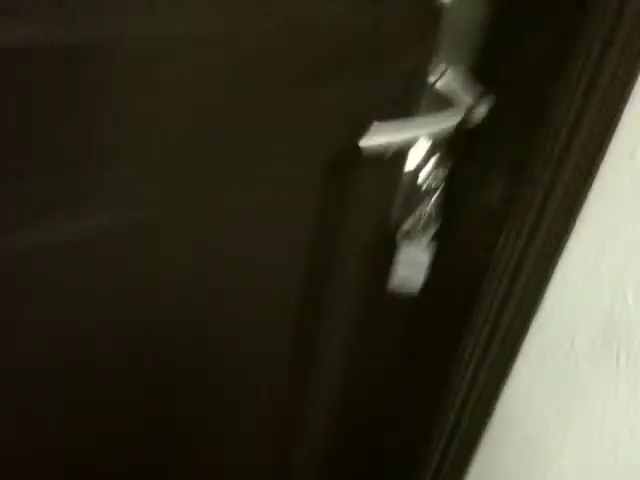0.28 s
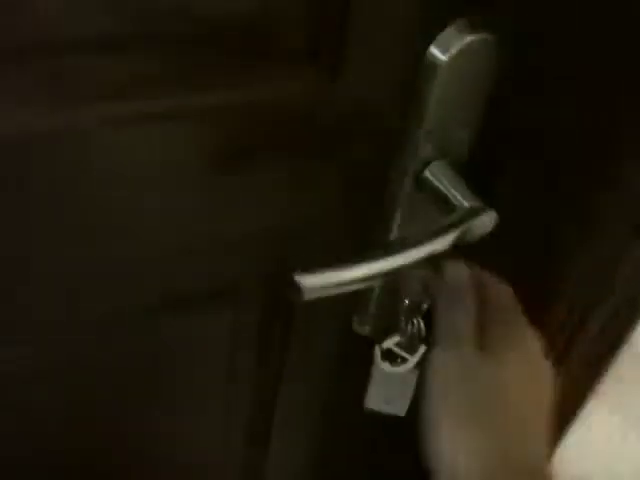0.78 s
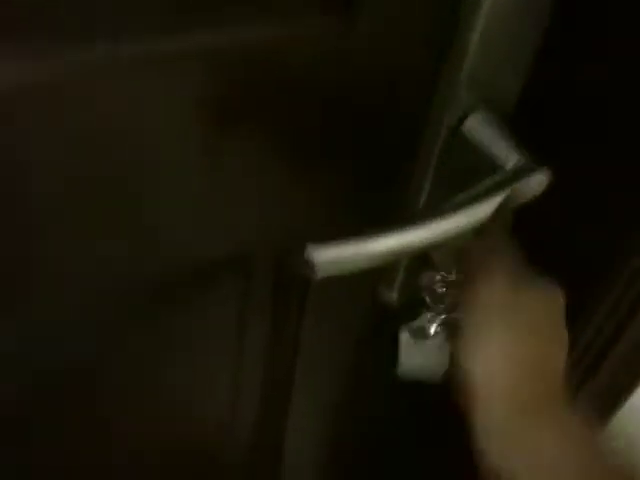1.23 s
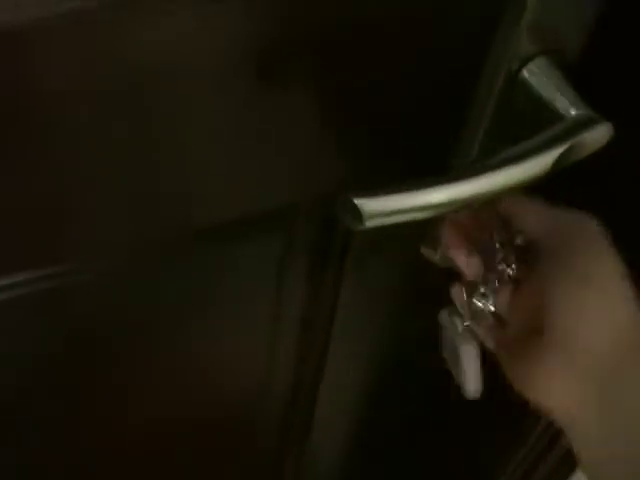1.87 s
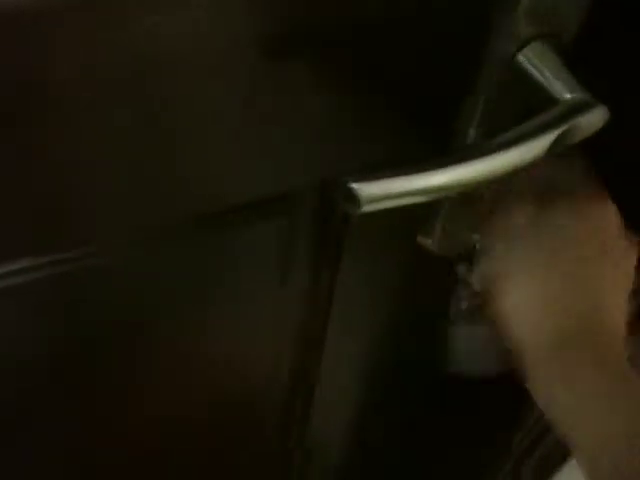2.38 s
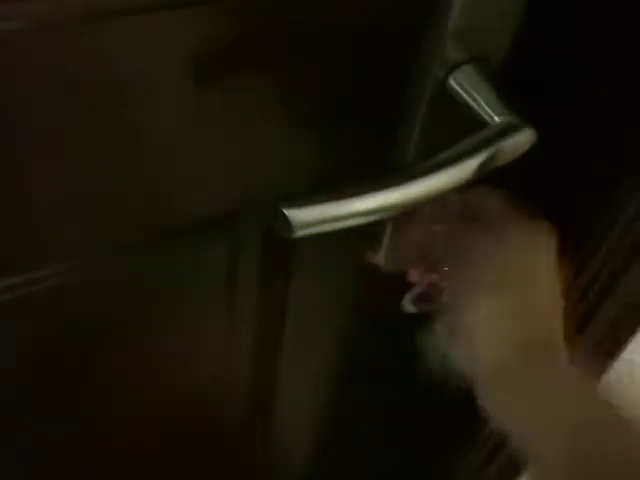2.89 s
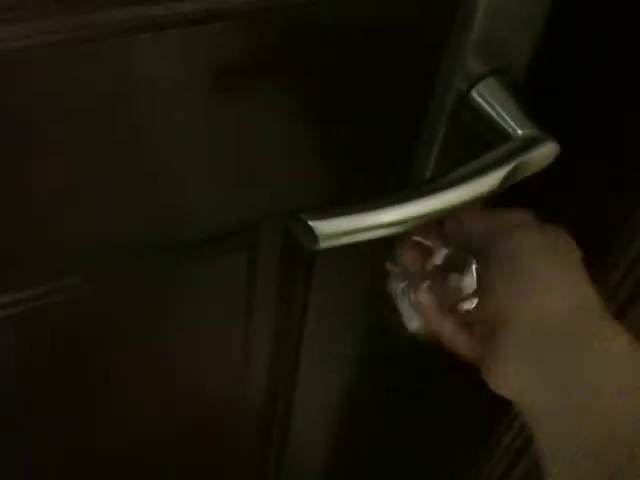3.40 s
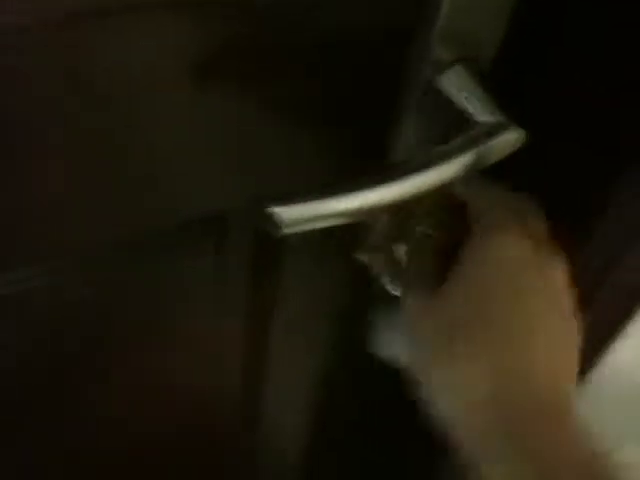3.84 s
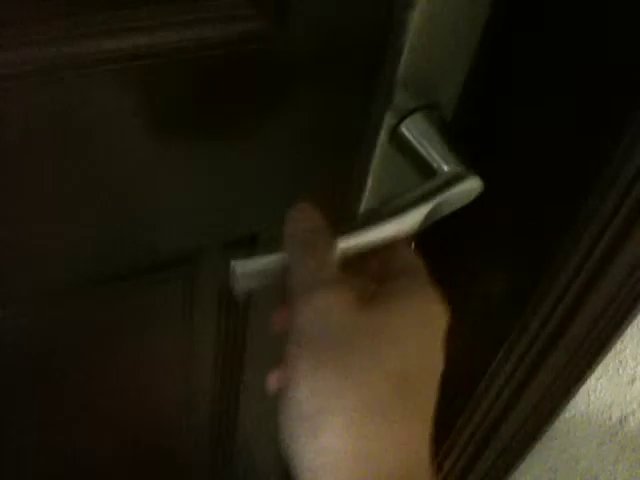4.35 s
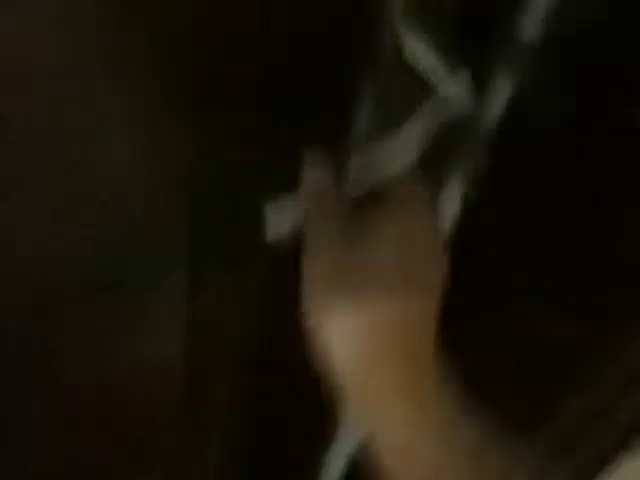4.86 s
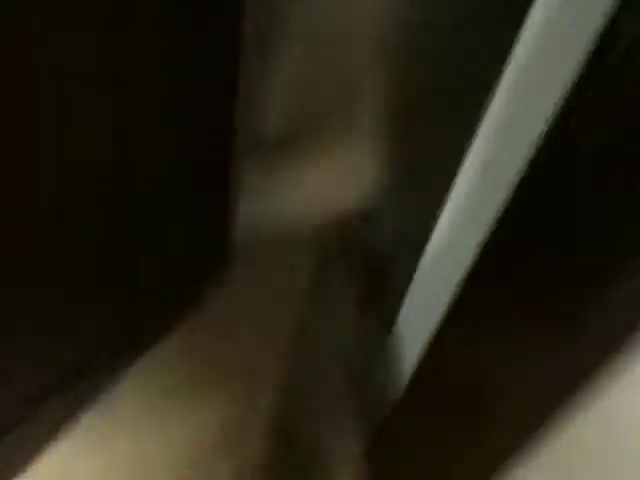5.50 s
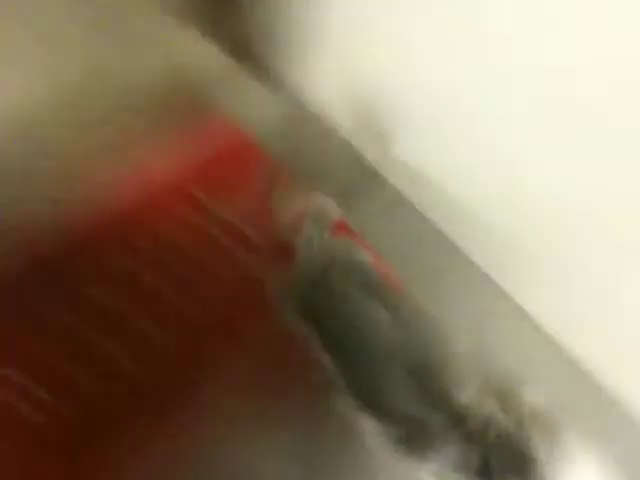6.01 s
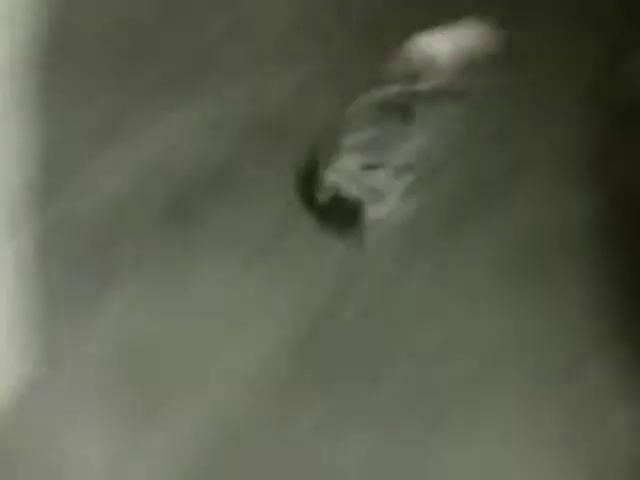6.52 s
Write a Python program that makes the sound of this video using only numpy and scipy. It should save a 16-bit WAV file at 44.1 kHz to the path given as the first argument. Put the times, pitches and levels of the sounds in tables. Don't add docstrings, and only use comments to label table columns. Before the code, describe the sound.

Faint taps and scrapes on wood lead to a key rattling in a metal lock. Sharp bolt clacks come in separate bursts, each with bright ringing keys and a short hollow door resonance. The lever is worked and the latch lets go, then low wobbling thumps hit the microphone. Close phone pickup in a small reverberant indoor space.

```python
import sys
import numpy as np
from scipy import signal
from scipy.fft import rfft, irfft, next_fast_len
from scipy.io import wavfile
from scipy.ndimage import uniform_filter1d

SR = 44100
rng = np.random.default_rng(int(sys.argv[2]) if len(sys.argv) > 2 else 0)


def to_wav(s):
    ch = np.atleast_2d(s).T
    pcm = np.round(np.clip(ch, -1, 1) * 32767)
    wavfile.write(sys.argv[1], SR, pcm.astype(np.int16))


def how_loud(loudness_db):
    steps = np.asarray(loudness_db, float) / 20
    return 10 ** steps


N = 297016

# (frequency [Hz], level [dB])
DOOR = [(60, -54), (130, 2), (170, -9), (300, 0), (470, -1.5), (680, -1.5), (900, -1), (1300, -5.5),
        (2500, -14), (9000, -73.5)]
# (frequency [Hz], level [dB])
LOCK = [(500, -9.5), (1200, 1.5), (1900, 1), (2400, 1.5), (3000, 2.5), (3800, 2), (4900, 1.5), (5800, 2),
        (7500, 0), (12000, -46)]
# (time [s], shudder [dB], after-rattle [dB])
LOADS = [(0.19, -94, -48), (1.14, -54.5, -51.5), (1.5, -59, -80), (2.161, -51.5, -30.5),
         (3.528, -41, -32.5), (3.962, -44, -36), (4.541, -57.5, -42), (5.217, -54.5, -44), (6.12, -64, -89),
         (6.21, -61, -94.5)]
# (time [s], peak level [dB])
SPLIT_RING = [(1.3483, -52), (1.4194, -54), (2.391, -45), (2.4877, -53), (2.598, -51), (2.6274, -42),
              (2.8529, -55), (3.04, -54), (3.1268, -56), (3.9659, -36), (4.0547, -41), (4.0986, -46),
              (4.1889, -50), (4.4303, -42), (4.53, -49), (4.6386, -60), (4.8003, -47), (4.8409, -53),
              (5.1856, -46), (5.3794, -58), (6.0197, -61), (6.324, -53)]
SMALL_KEY = [(1.0294, -61), (1.3803, -56), (1.6372, -58), (2.4867, -57), (2.7541, -50), (3.0365, -48),
             (3.1263, -51.5), (4.0976, -61), (4.206, -56), (4.277, -46), (4.4293, -47), (4.8013, -41)]
THIN_KEY = [(2.44, -53), (2.495, -53), (2.5551, -56), (3.036, -52), (3.969, -42), (4.0976, -64),
            (4.287, -54), (4.437, -49)]
LONG_KEY = [(1.4027, -72), (2.67, -57), (2.71, -59), (3.971, -57), (4.0986, -35.5), (4.4307, -35.5),
            (4.806, -48.5), (5.1926, -51), (5.4201, -54)]
SPARE_KEY = [(3.772, -53), (5.3818, -46), (5.9444, -59), (6.012, -50), (6.323, -53.5), (6.3908, -55)]
FLAT_KEY = [(4.2782, -55), (4.43, -40), (4.803, -57), (5.2031, -55)]
WIDE_KEY = [(2.4887, -54), (3.1233, -54), (3.9045, -46), (4.2782, -48), (4.4298, -47)]
CLIP = [(3.9729, -45), (4.428, -56), (4.5481, -57), (5.1856, -54)]
# (pitch [Hz], decay time t60 [s], strikes (time [s], peak level [dB]))
BUNCH = [
    (15460, .3, SPLIT_RING),
    (10660, .13, SMALL_KEY),
    (11790, .21, THIN_KEY),
    (7155, .19, LONG_KEY),
    (7450, .24, SPARE_KEY),
    (8303, .38, FLAT_KEY),
    (6450, .23, WIDE_KEY),
    (13360, .16, CLIP),
]


def band(x, lo_hz, hi_hz):
    sos = signal.butter(2, [lo_hz, min(hi_hz, .45 * SR)], "band", fs=SR, output="sos")
    return signal.sosfilt(sos, x)


def colour(x, points):
    hz, db = np.transpose(points)
    size = next_fast_len(len(x))
    f = np.fft.rfftfreq(size, 1 / SR)
    gain = how_loud(np.interp(np.log(f + 1), np.log(hz), db))
    return irfft(rfft(x, size) * gain, size)[:len(x)]


def rings(hz, t60, size):
    t = np.arange(size) / SR
    decay = np.exp(-np.log(1000) * t / np.reshape(t60, (-1, 1)))
    return np.sin(2 * np.pi * np.outer(hz, t)) * decay


def add(out, s, x):
    i = int(s * SR)
    out[i:i + len(x)] += x[:max(N - i, 0)]


def unit(x):
    return x / np.sqrt(np.mean(x ** 2))


def top(x):
    return x / np.abs(x).max()


def curves(table):
    s, *columns = np.transpose(table)
    return [np.interp(np.arange(N) / SR, s, c, left=c[0], right=c[-1]) for c in columns]


def peaks(x, table):
    out = np.zeros(N)
    for hz, width, db in table:
        b, a = signal.iirpeak(hz, hz / width, fs=SR)
        out += how_loud(db) * unit(signal.lfilter(b, a, x))
    return unit(out)


def body(points, favour_hz, favour_db, modes=(), size=1024):
    f = np.fft.rfftfreq(2 * size, 1 / SR) + 1
    at_hz, at_db = np.transpose(points)
    db = np.interp(np.log(f), np.log(at_hz), at_db)
    db += favour_db * np.exp(-(np.log(f / favour_hz) / 0.18) ** 2)
    for hz, width in modes:
        db += 8.5 * rng.random() / (1 + ((f - hz) / width) ** 2)
    cepstrum = irfft(db * np.log(10) / 20)
    cepstrum[1:size] *= 2
    cepstrum[size + 1:] = 0
    return irfft(np.exp(rfft(cepstrum)))[:size]


def after_loads(levels_db, t60):
    rise_s = 0.027
    late = np.arange(N) / SR - np.array(LOADS)[:, :1]
    db = np.where(late < 0, late * 20 / np.log(10) / rise_s, -60 * late / t60)
    gains = how_loud(np.reshape(levels_db, (-1, 1)) + np.maximum(db, -200))
    return np.sqrt(np.sum(gains ** 2, axis=0))


def hum():
    # (frequency [Hz], level [dB per Hz])
    outline = [(20, -28), (50, -10.5), (90, 0.5), (160, -4), (300, 1.5), (500, -13.5), (1200, -17),
               (3500, -28.5), (5500, -21.5), (7200, -27), (9000, -17.5), (12000, -23.5), (15000, -20),
               (16500, -24)]
    whine_hz = 7200
    steady = how_loud(-67) * unit(colour(rng.standard_normal(N), outline))
    whine = unit(band(rng.standard_normal(N), .97 * whine_hz, 1.04 * whine_hz))
    return steady + how_loud(-83.5) * whine


def room(x):
    # (centre [Hz], t60 [s], level [dB])
    bands = [(190, 0.74, -25.5), (480, 0.78, -26), (1550, 0.71, -17.5), (4250, 0.5, -21), (8800, 0.34, -13)]
    t = np.arange(SR) / SR
    tail = np.zeros(len(t))
    for hz, t60, db in bands:
        noise = unit(band(rng.standard_normal(len(t)), hz / 3.05, hz * 2.38))
        decay = np.exp(-np.log(1000) * t / t60)
        tail += how_loud(db) * noise * decay * np.sqrt(2 * np.log(1000) / (t60 * SR))
    tail *= np.clip((t - .003) / 0.0026, 0, 1)
    return signal.fftconvolve(x, tail)[:N]


def shudder():
    # (frequency [Hz], width [Hz], level [dB])
    leaf = [(147.1, 5.8, 1), (162.5, 14, 1), (184, 8.5, -4), (309.5, 7.4, -6), (355.4, 12, -24),
            (445, 5.4, -9.5)]
    rest_db = -67
    gain = after_loads(np.array(LOADS)[:, 1] - 2.5, t60=0.92) + how_loud(rest_db)
    return gain * peaks(rng.standard_normal(N), leaf)


def bumps():
    # (time [s], peak level [dB], wobble [Hz])
    touches = [(6.103, -30, 440), (6.028, -37, 150), (6.04, -26, 129), (6.059, -27, 124), (6.106, -16, 254),
               (6.114, -18.5, 176), (6.127, -22.5, 156), (6.141, -18.5, 163), (6.172, -19.5, 172),
               (6.191, -17, 154), (6.209, -16, 157), (6.243, -29, 172), (6.258, -20, 138),
               (6.302, -51, 161)]
    rise_s = 0.0034
    out, t = np.zeros(N), np.arange(2000) / SR
    swell = (t / rise_s) * np.exp(1 - t / rise_s)
    for s, db, hz in touches:
        add(out, s - .002, how_loud(db - 16.5) * swell * np.sin(2 * np.pi * hz * t))
    return out


def swish():
    # (time [s], half length [s], level [dB], pitch [Hz], width [share of pitch])
    rubs = [(2.583, 0.03, -53, 330, 1.6), (2.775, 0.019, -55.5, 1440, 0.23), (2.828, 0.017, -53, 940, 0.16),
            (2.87, 0.013, -57, 670, .3), (2.99, 0.022, -75, 1440, 0.079), (3.057, 0.019, -56.5, 880, 0.13),
            (3.143, 0.013, -60, 1270, 0.12), (3.152, 0.033, -63, 640, 0.37), (3.2, 0.019, -64, 3550, 0.091),
            (3.265, .018, -53, 610, 0.44), (3.272, 0.0043, -48, 3500, 0.089),
            (3.281, .006, -45, 6640, 0.082), (3.5, 0.0092, -47.5, 2800, 0.16),
            (3.459, 0.016, -48, 230, 0.7), (3.7, .015, -47.5, 900, 1.2), (3.619, .16, -61.5, 70, 1.2),
            (0.22, .05, -63, 1860, 0.34), (3.8, 0.024, -44.5, 9800, .5), (6.471, .14, -65, 2060, 0.3),
            (6.418, .03, -70, 2850, .08), (5.755, .02, -57, 800, 1.05), (5.0, .07, -73, 1450, 1.6),
            (5.145, 0.0089, -46, 730, 1.3), (3.1, .08, -58, 200, 0.75), (6.43, 0.096, -61, 4300, 1.6),
            (2.138, 0.0055, -31, 7700, 0.29), (1.065, 0.013, -64, 1500, 1.1),
            (1.122, 0.0066, -62, 5500, 0.66), (6.502, .12, -67, 540, 1.06)]
    out = np.zeros(N)
    for s, half, db, hz, share in rubs:
        noise, patchy = rng.standard_normal((2, int(4 * half * SR) + 400))
        swell = np.exp(-((np.arange(len(noise)) / SR - 2 * half) / half) ** 2)
        spread = 1 + abs(share) / 2
        hiss = unit(band(noise, hz / spread, hz * spread))
        patches_db = unit(uniform_filter1d(patchy, size=400))
        add(out, s - 2 * half, how_loud(db + patches_db) * swell * hiss)
    return out


def squeak():
    # (time [s], slip rate [Hz], level [dB])
    slips = [
        (3.33, 644, -60),
        (3.355, 670, -42.5),
        (3.42, 717, -42),
        (3.44, 720, -77),
    ]
    hz, db = curves(slips)
    waver = 1 + 0.022 * unit(uniform_filter1d(rng.standard_normal(N), size=200))
    phase = 2 * np.pi * np.cumsum(hz * waver) / SR
    i = np.arange(N)
    on = (i > slips[0][0] * SR) & (i < slips[-1][0] * SR)
    partials_db = [-10.5, -12, -24, -16]
    stack = sum(how_loud(g) * np.sin(k * phase) for k, g in enumerate(partials_db, start=1))
    return on * how_loud(db) * stack


def clinks():
    out = np.zeros(N)
    touches_per_s = 14
    for hz, _, _ in BUNCH:
        touches = (rng.random(N) < touches_per_s / SR) * how_loud(4 * rng.standard_normal(N))
        out += signal.oaconvolve(touches, rings([hz], [.035], size=2000)[0])[:N]
    return unit(out)


def scrape():
    # (time [s], effort [dB], brightness [dB])
    hand = [(0.0, -55.5, -9), (0.1, -69.5, 6.5), (0.9, -79, -11), (1.22, -78.5, -15), (1.37, -65, 7),
            (1.65, -61, 3.5), (1.95, -79.5, -11), (2.36, -58, 6.5), (2.55, -55.5, -7), (3.04, -71.5, -38),
            (3.43, -59, -17), (4.11, -54.5, 4.5), (4.95, -74, -8.5), (5.3, -60, 2.5), (5.62, -70.5, 7.5),
            (5.95, -64.5, 3), (6.45, -65, 6), (6.74, -67.5, 8.5)]
    # (frequency [Hz], width [Hz], level [dB])
    case_rings = [(872, 18, -1.5), (1070, 18, -17.5), (1322, 18, 2), (1400, 20, -1.5), (1880, 30, -10),
                  (2010, 30, 5), (2210, 25, -1), (2300, 25, -5), (2530, 28, -9), (2880, 30, 1),
                  (3070, 35, -1.5)]
    effort_db, bright_db = curves(hand)
    rattle = after_loads(np.array(LOADS)[:, 2], t60=0.38)
    door = how_loud(effort_db - 1.5 - 0.45 * bright_db) + rattle
    lock = how_loud(effort_db)
    sizes = how_loud(2.5 * np.minimum(rng.exponential(size=N), 3))
    grains = (rng.random(N) < .06) * sizes * rng.uniform(-1, 1, size=N)
    slow = uniform_filter1d(rng.standard_normal((3, N)), size=1200)
    fits = unit(uniform_filter1d(slow, size=1200))
    grains = (unit(grains) + rng.standard_normal(N)) * how_loud(1.8 * fits[0] + 2.0 * fits)
    edges = unit(band(grains[2], 5500, 12000)) + .4 * clinks()
    loose_case = unit(band(rng.standard_normal(N), 1280, 3300))
    out = door * how_loud(-8.0) * unit(colour(grains[0], DOOR))
    out += lock * unit(colour(grains[1], LOCK))
    out += how_loud(-19) * (rattle + lock) * peaks(grains[1], case_rings)
    out += how_loud(-9.5 - 3.5) * rattle * loose_case
    return out + how_loud(effort_db + bright_db - 5.0) * unit(edges)


def pings():
    # (time [s], peak level [dB], pitch [Hz], t60 [s])
    gripped = [(1.1315, -34.5, 330, 0.041), (1.1315, -32.5, 797, .035), (1.133, -44, 190, 0.11),
               (2.137, -26, 985, 0.075), (3.5335, -23.5, 1405, 0.075), (3.9666, -15.5, 3037, 0.056),
               (3.9672, -26, 2190, 0.044), (3.968, -25.5, 900, 0.074), (4.1815, -32, 4900, 0.032),
               (5.142, -40.5, 1397, 0.084), (5.1535, -30, 8965, 0.04), (2.14, -30, 9954, .056),
               (3.502, -40, 2280, .06), (3.773, -34, 950, .05), (3.773, -36.5, 640, .05),
               (3.773, -38, 340, .06), (1.483, -42.5, 450, .09), (1.483, -41, 950, .07),
               (5.829, -45, 1570, .06), (5.829, -53, 2950, .08), (.989, -52, 800, .05),
               (5.914, -52, 1250, .05), (3.29, -40, 1420, .05), (3.773, -31, 11500, 0.027),
               (1.1315, -39, 560, .04), (4.182, -29.5, 2200, .04), (4.182, -31, 4300, 0.024),
               (5.187, -42, 6000, 0.055), (1.132, -42, 1390, 0.033)]
    out, t = np.zeros(N), np.arange(4000) / SR
    for s, db, hz, t60 in gripped:
        build = 1 - np.exp(-t / (0.028 * t60))
        add(out, s, how_loud(db + 2.5) * build * rings([hz], [t60], size=len(t))[0])
    return out


def jingle():
    # (time [s], peak level [dB], brightness [dB per octave])
    shakes = [(1.483, -51, 5), (2.137, -48, -2), (2.305, -53, -3), (2.628, -70, 7), (2.941, -63, 5),
              (3.528, -66, 0), (3.773, -52, 1), (3.968, -37, 4), (4.054, -57, 2), (4.099, -48, -16),
              (4.198, -57, -7), (4.558, -56, -8), (5.186, -63, 0)]
    # (frequency [Hz], level [dB], t60 [s])
    bunch_modes = [(4960, -3, .23), (5615, -8, .11), (7144, -6, .5), (8030, -8, .15), (8320, -4, .5),
                   (9700, -4, .3), (9940, -6, .14), (10430, -8, .15), (10660, -8, .4), (11200, -3, .2),
                   (11780, -1, .3), (12100, -8, .24), (12870, -12, .3), (14300, -16, .3)]
    out = np.zeros(N)
    hz, mode_db, t60 = np.transpose(bunch_modes)
    fade = np.hanning(18000)[9000:]
    for s, db, tilt_db in shakes:
        luck = rng.standard_normal((3, len(hz)))
        gains = how_loud(db + mode_db + tilt_db * np.log2(hz / 8000) + 3 * luck[0])
        ring = rings(hz * (1 + .003 * luck[1]), t60 * how_loud(luck[2]), size=9000) * fade
        flutter = unit(uniform_filter1d(rng.standard_normal((len(hz), 900)), size=12))
        add(out, s, gains @ (ring * (.6 + .6 * np.repeat(flutter, repeats=10, axis=1))))
    return out


def keys():
    # (time [s], peak
    # level [dB], pitch [Hz], t60 [s])
    chimes = [(1.042, -64, 9884, .5), (1.0705, -62, 9884, .3), (2.147, -44, 2546, .4),
              (3.55, -32, 1314, .5), (3.545, -39, 2640, .3), (3.56, -40, 2300, .38),
              (3.538, -38, 1104, .16), (4.1, -56, 5766, .8), (4.1994, -47.5, 5766, 1.8),
              (4.5281, -33, 2750, .1), (4.56, -47, 2740, .5), (4.85, -55, 2100, .11),
              (5.168, -46.5, 8965, .6), (0.171, -55, 1850, .2), (3.971, -46, 7144, .36)]
    out = np.zeros(N)
    struck = [(s, db, hz, t60) for hz, t60, hits in BUNCH for s, db in hits]
    for s, db, hz, t60 in struck + list(chimes):
        loose = min(1, (hz / 6000) ** 2)
        split = 1 + 0.0024 * rng.standard_normal(3) * np.array([.2, 1, 1])
        gains = np.array([1, 0.6 * min(1, 0.48 / t60) * loose, .3 * loose])
        ring = gains @ rings(hz * split, [t60, t60, .5 * t60], size=int(SR * min(t60, .36)))
        swing = unit(uniform_filter1d(rng.standard_normal(len(ring)), size=400))
        swing_db = (1 + 3.5 * loose) * min(1, .25 / t60) * swing
        add(out, s, how_loud(db - 5.5 + swing_db) * ring)
    return out


def strikes():
    # (time [s], peak level [dB], edges [dB re peak], strongest ring [Hz], chatter [ms])
    throws = [(0.1678, -31.5, -41, 1780, 6.5), (0.9876, -35, -22.5, 2200, 6.1),
              (1.482, -18, -14, 5460, 1.47), (1.6998, -31.5, -19, 1620, 6.4),
              (2.081, -19.5, -31.5, 2700, 4.8), (2.1375, -10.5, -17, 2480, 3.04),
              (2.3043, -17.5, -15, 4230, 1.96), (2.334, -29.5, -20, 3700, 2.4),
              (2.6267, -34, -1, 5600, 3.9), (2.9387, -23.5, -17, 4000, 4.9),
              (3.2699, -35.5, -12, 3680, 2.8), (3.443, -25.5, -14, 6300, 2.67),
              (3.5271, -16, -11, 5630, 3.7), (3.5383, -12.5, -26, 2577, 2.32),
              (3.7722, -16, -6.5, 3660, 1.53), (3.9663, -8, -34, 2200, 4.0), (3.9666, -21, 3.5, 6000, 0.81),
              (4.0522, -18.5, -12, 3300, 2.24), (4.098, -22, -11, 3550, 2), (4.1814, -15, -30.5, 3200, 3.4),
              (4.5565, -22.5, -21, 6360, 5.8), (5.1395, -31, -17, 4600, 10),
              (5.1847, -27.5, -18, 1720, 9.7)]
    # (time [s], peak level [dB], edges [dB re peak], strongest ring [Hz], chatter [ms])
    drags = [(1.15, -42.5, -32, 3300, 6.3), (2.076, -29.5, -25.5, 2770, 43),
             (2.1275, -18.5, -23, 6500, 3.7), (2.131, -12, -19, 5460, 2.74),
             (2.1424, -17.5, -28, 2290, 4.5), (3.286, -31.5, -21.5, 1360, 6.6),
             (3.506, -29.5, -30, 2240, 12), (3.531, -12, -17, 5570, 3.6), (3.5333, -13.5, -37, 1960, 3.2),
             (3.9243, -31.5, -22, 4500, 13.4), (4.2888, -37, -12, 7100, 5),
             (4.5256, -28.5, -21, 2610, 11.3), (5.0707, -49.5, -7, 6570, 36),
             (5.16, -29.5, -14.5, 3670, 2.9), (5.4173, -52, -19.5, 7300, 13), (5.814, -38.5, -14, 1550, 16),
             (6.0115, -40, -13, 7200, 15), (6.389, -52.5, -2, 7140, 18)]
    # (time [s], peak level [dB], door panel [dB re peak], chatter [ms])
    knocks = [(0.0192, -41, -6, 3.7), (0.0716, -43.5, -14.5, 9.9), (0.4813, -45, -6.5, 5.1),
              (1.1306, -42.5, 6, 1.85), (1.3388, -43, -12, 13.3), (1.581, -43.5, -5, 10),
              (1.6357, -50.5, 2, 1.9), (1.6566, -38.5, -3.5, 7.9), (1.7121, -33.5, -11.5, 5.6),
              (1.7866, -46, -11.5, 4.3), (2.7536, -39, -9, 6.4), (2.813, -51, 1, 10.7),
              (2.8409, -39, -14, 12.2), (2.8598, -41.5, -1, 3.3), (3.015, -43, -14, 2.5),
              (3.3313, -32.5, -12.5, 0.9), (3.4749, -34.5, -6.5, 14), (5.1191, -44.5, -8, 21),
              (5.739, -39, -14.5, 2.3), (5.8296, -52, -24, 2.9), (5.914, -47, -12, 3),
              (6.039, -43, -11.5, 7.8), (6.177, -51.5, 2, 7.8)]
    # (time [s], peak level [dB], edges [dB re peak], strongest ring [Hz])
    ticks = [(1.2978, -47.5, -8, 6340), (1.424, -54, 2, 7000), (1.869, -47.5, -14, 2440),
             (1.9884, -51, -16, 5600), (2.382, -34.5, -21, 4350), (2.4888, -39, -37, 6060),
             (2.553, -35.5, -10.5, 6530), (3.0356, -35, -6.5, 6230), (3.1249, -38, -23, 7100),
             (3.184, -45, -14, 3470), (3.2051, -44, -6, 3500), (3.245, -33.5, -8.5, 3930),
             (3.903, -37, -6, 6400), (4.2782, -39, -9, 6340), (4.429, -58, -26, 7100),
             (4.7733, -49, -8, 5540), (4.803, -47.5, -0.5, 6940), (5.3832, -58, -27, 7400),
             (5.51, -55, -2, 7350), (5.613, -52, 4, 7200), (5.67, -48.5, 3, 7000),
             (5.7991, -37.5, -6.5, 6450), (5.957, -42, -37, 2670), (6.097, -44.5, 0, 6180),
             (6.2195, -52.5, 1, 6530), (6.3304, -54.5, 11.5, 7430), (6.6124, -50.5, -3, 7330),
             (2.012, -66, 0, 7400), (2.771, -51, 1, 7004), (2.814, -48, -5, 6800), (3.141, -45.5, -9, 6800),
             (3.333, -47, -19, 6700), (3.476, -36.5, -11, 6500), (2.437, -56, -2, 7000),
             (2.6048, -57, 0, 7000), (2.6916, -46, -4, 3000), (4.843, -56, -12, 6000),
             (5.197, -35.5, -19, 2300)]
    sharp_s = .00025
    blow_list = []
    for s, db, edge_db, hz, ms in throws:
        blow_list.append((s, db, -22, edge_db, hz, ms / 1000, sharp_s))
    for s, db, edge_db, hz, ms in drags:
        door_db = -10.5 + 0.5 * edge_db
        blow_list.append((s, db, door_db, edge_db, hz, ms / 1000, .35 * ms / 1000))
    for s, db, door_db, ms in knocks:
        edge_db = -25 - door_db
        blow_list.append((s, db, door_db, edge_db, 1270, ms / 1000, .22 * ms / 1000))
    for s, db, edge_db, hz in ticks:
        blow_list.append((s, db, -15, edge_db, hz, .004, sharp_s))
    return blow_list


def blows():
    # (frequency [Hz], half width [Hz])
    lock_modes = [(1410, 60), (1880, 45), (2310, 55), (2650, 60), (3050, 50), (3670, 70), (4940, 80),
                  (5710, 120)]
    hard_edge_db, soft_tilt = -6, .28
    near, far, t = np.zeros(N), np.zeros(N), np.arange(4500) / SR
    edges = band(np.eye(1, 256)[0], 7700, 13170)
    panel_modes = [(360, 4.4), (470, 24), (870, 180), (1090, 370)]
    panel = body(DOOR, favour_hz=646, favour_db=3.0, modes=panel_modes)
    for s, db, door_db, edge_db, hz, span, rise in strikes():
        hit = rng.random(len(t)) < .12
        size, hiss, steel, wood = rng.standard_normal((4, len(t)))
        swell = 1 - np.exp(-t / rise)
        chatter = (hit * size + 0.55 * hiss) * swell * np.exp(-t / span)
        case_shake = chatter + 0.38 * steel * swell * np.exp(-t / (span + 0.0053))
        panel_shake = chatter + 0.29 * wood * swell * np.exp(-t / (span + 0.031))
        tilt_db = soft_tilt * min(edge_db - hard_edge_db, 0)
        dull = [(f, g + tilt_db * max(np.log2(f / hz), 0)) for f, g in LOCK]
        case = body(dull, favour_hz=hz, favour_db=6.0, modes=lock_modes)
        parts = [(case_shake, case, -1.5), (chatter, edges, edge_db + 7.5), (panel_shake, panel, door_db + 4)]
        for shake, response, part_db in parts:
            sound = how_loud(db + part_db) * top(signal.fftconvolve(shake, response))
            add(near, s, sound)
            add(far, s + .5 * span, response * np.sqrt(np.sum(sound ** 2) / np.sum(response ** 2)))
    return near, far


def scene():
    near, far = blows()
    tones = keys() + squeak() + jingle()
    short = pings()
    echo = room(far + tones + 0.32 * short)
    handling = scrape() + swish() + bumps() + shudder()
    return (near + tones + short + echo + handling + hum())[None]


def roll_off(x):
    return signal.sosfilt(signal.butter(12, 16810, fs=SR, output="sos"), x)


def record(dry):
    x = signal.sosfilt(signal.butter(1, 60, "high", fs=SR, output="sos"), dry)
    x = signal.sosfilt(signal.ellip(6, .5, 30, 15900, fs=SR, output="sos"), x)
    return roll_off(x)


dry = scene()
out = record(dry)
to_wav(out)
```